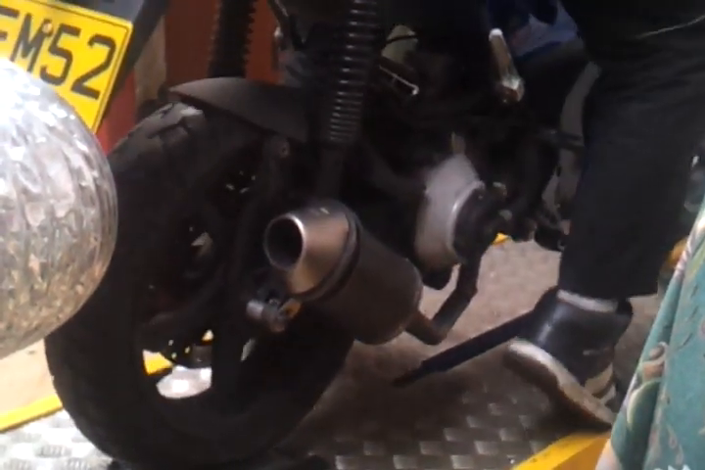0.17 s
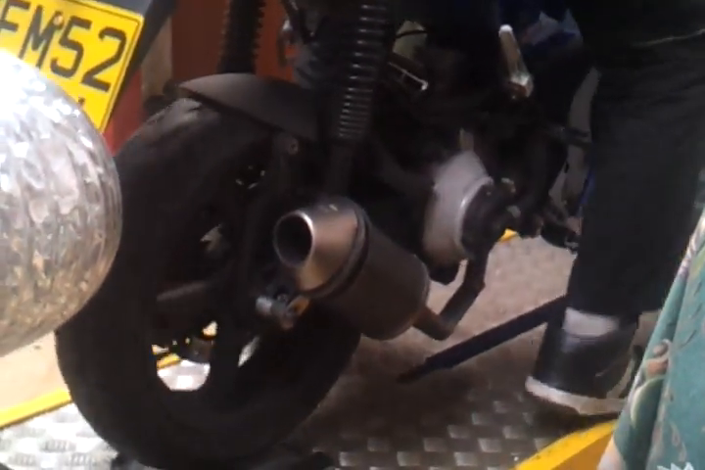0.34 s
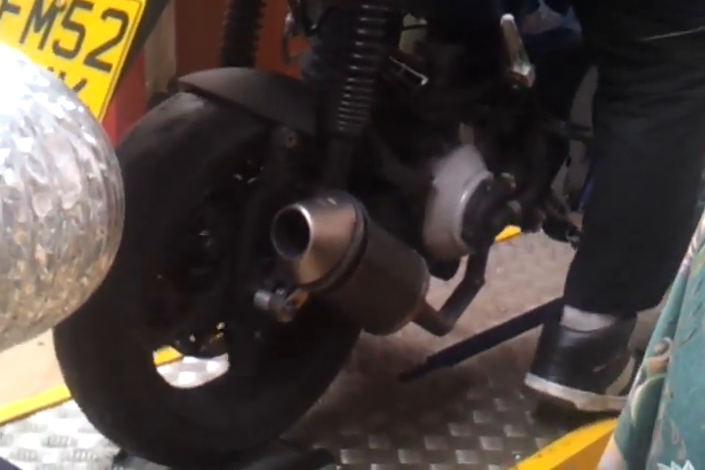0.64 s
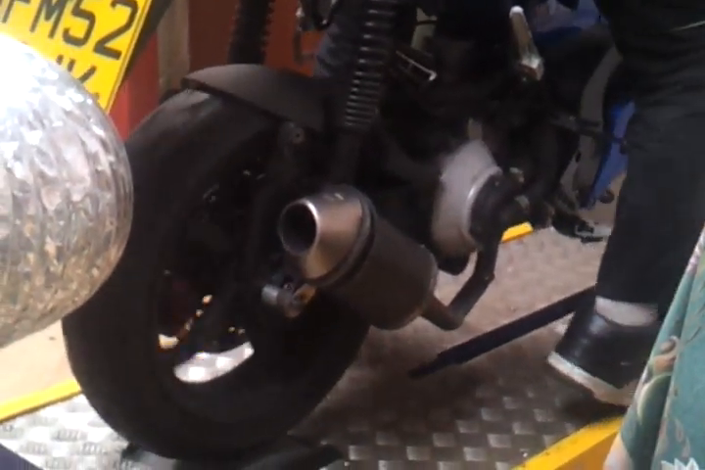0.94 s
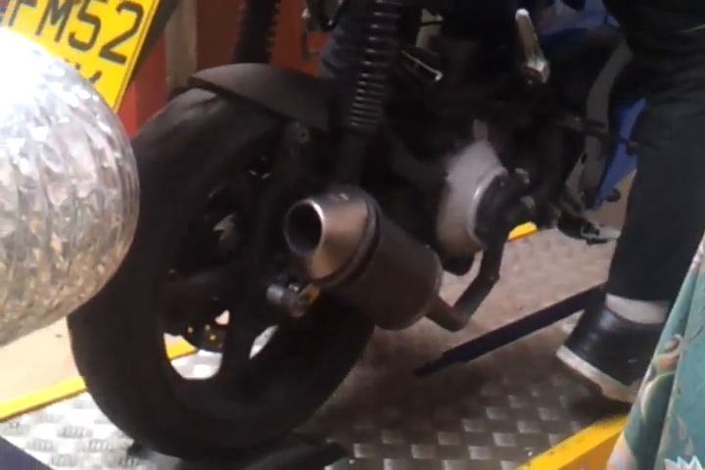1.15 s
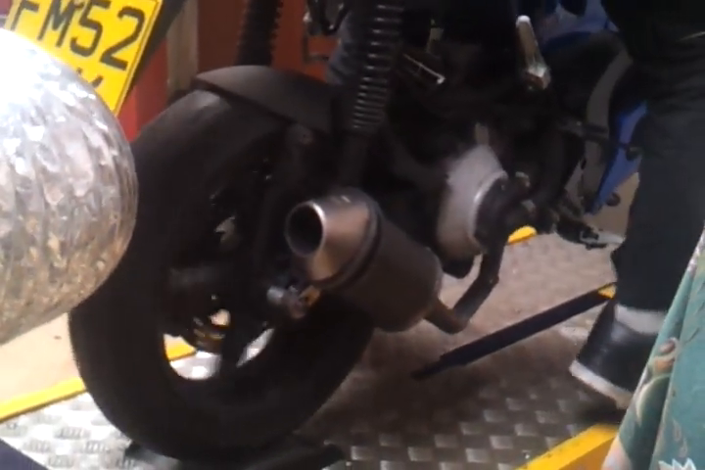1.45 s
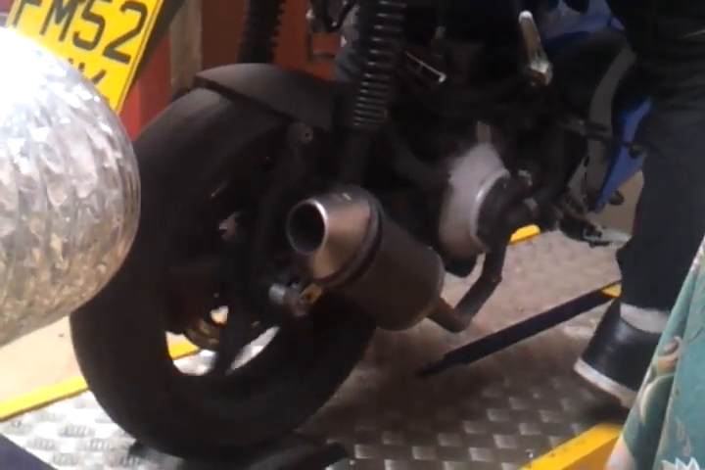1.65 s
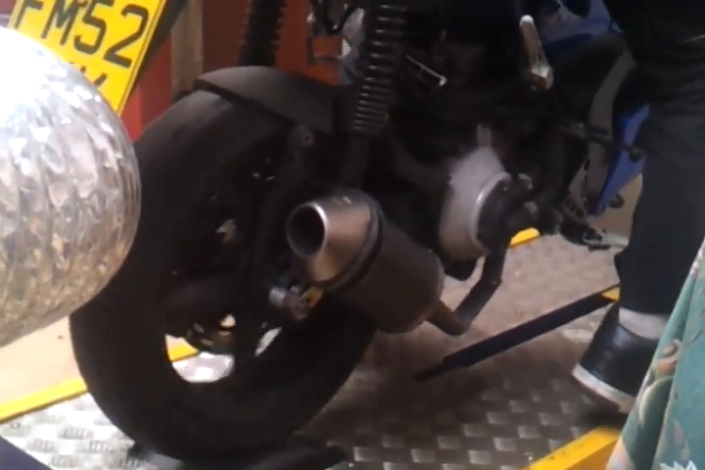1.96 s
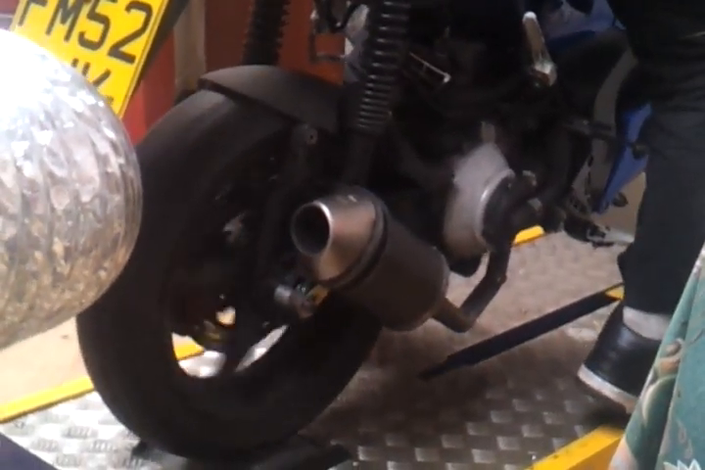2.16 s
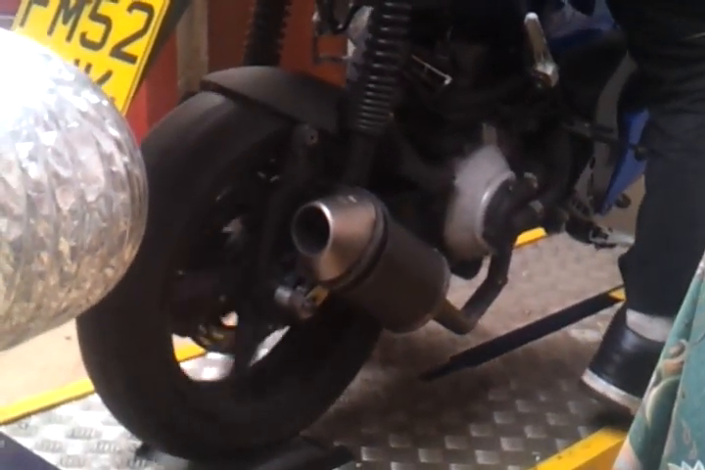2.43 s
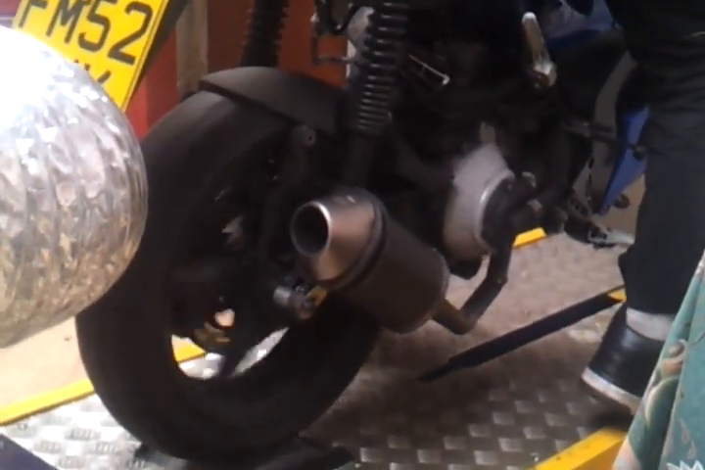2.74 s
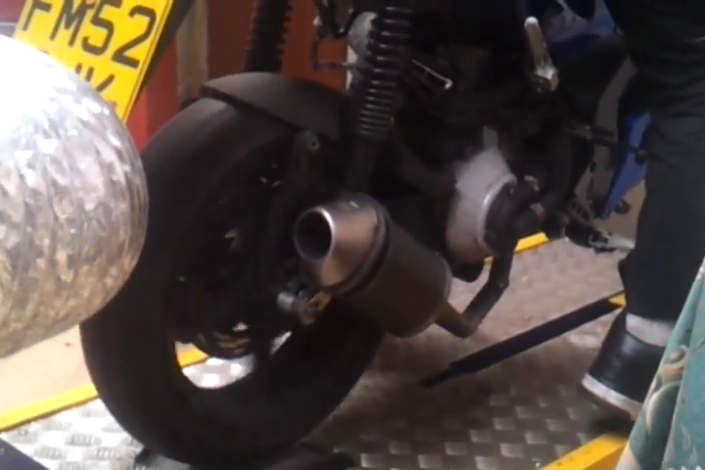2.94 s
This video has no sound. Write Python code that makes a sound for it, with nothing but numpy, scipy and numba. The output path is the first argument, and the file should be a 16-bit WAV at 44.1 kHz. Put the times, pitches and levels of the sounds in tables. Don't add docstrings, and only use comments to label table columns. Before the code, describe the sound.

A parked motorcycle engine idles and is revved four times in short, harsh, distorted exhaust bursts.

```python
import sys
import numpy as np
from scipy import signal
from scipy.fft import rfft, irfft
from scipy.io import wavfile
from scipy.ndimage import uniform_filter1d
from numba import njit

SR = 44100
rng = np.random.default_rng(int(sys.argv[2]) if len(sys.argv) > 2 else 0)


def to_wav(s):
    ch = np.atleast_2d(s).T
    pcm = np.round(np.clip(ch, -1, 1) * 32767)
    wavfile.write(sys.argv[1], SR, pcm.astype(np.int16))


def field_ratio(decibels):
    return 10 ** (np.asarray(decibels, dtype=float) / 20)


N = 136710

# (twist begins [s], wide open [s], shut [s], peak firing rate [Hz])
BLIPS = [
    (.21, .32, .46, 51.5),
    (1.19, 1.28, 1.45, 55.5),
    (1.97, 2.06, 2.19, 54),
    (2.75, 2.83, 2.975, 55),
]
BLIP_LOADS = (0.86, 1.06, 1.005, 0.99)
# (centre [Hz], width [Hz], level off throttle [dB], gain at full load [dB])
PIPE_MODES = [(100.7, 21, -3.5, -6), (206.66, 19.7, -6.5, 2.5), (263.85, 20.9, -4.5, 0.5),
              (300.4, 32.4, -11, 1), (369.4, 48, -12, 8.5), (455.4, 83, -18.5, 14.5), (604, 215, -21, 18.5),
              (740, 198, -21.5, 16), (1112, 193, -33, 21), (1445, 160, -29, 21.5)]
# (centre [Hz], width [Hz], level off throttle [dB], gain at full load [dB], puffed share [0-1])
GAS_BANDS = [(309, 238, -15.5, 10.5, .4), (750, 583, -23.5, 17.5, 1), (1836, 740, -21, 12, 0.93),
             (3423, 950, -26.5, 15, 0.83), (5730, 3100, -18.5, 8.5, 0.84)]
# (time [s], level [dB], centre [Hz])
CLACKS = [
    (.23, -7, 5900),
    (.787, -8, 4200),
    (1.2, -8, 5800),
    (2.02, -3, 5800),
    (2.78, -10, 5800),
]

IDLE_HZ, WARMUP_S = 17.5, 0.3


def level(x):
    return x / np.sqrt(np.mean(x ** 2))


@njit
def svf(x, hz, width_hz):
    y = np.empty(len(x))
    band, low = 0., 0.
    g, k = np.tan(np.pi * hz / SR), width_hz / hz
    for i in range(len(x)):
        v = (band + g * (x[i] - low)) / (1 + g * (g + k))
        band = 2 * v - band
        low += 2 * g * v
        y[i] = k * v
    return y


def resonance(x, hz, first_width_hz, second_width_hz):
    return level(svf(svf(x, 1. * hz, 1. * first_width_hz), 1. * hz, 1. * second_width_hz))


def walk(rate_hz, size):
    hold = int(SR / rate_hz)
    steps = np.repeat(rng.standard_normal(size // hold + 1), hold)
    return 1.1 * uniform_filter1d(uniform_filter1d(steps, hold), hold)[:size]


def throttle(t):
    sag_s, sag_bend, rise_bend = 0.265, 1.15, 1.15
    load_fade_s, fade_bend, open_bend = 0.19, 1.5, 1.3
    hz, load = np.full(len(t), IDLE_HZ), np.zeros(len(t))
    for (start, wide, shut, peak_hz), push in zip(BLIPS, BLIP_LOADS):
        start_hz = np.interp(start, t, hz)
        since_shut = np.maximum(t - shut, 0)
        rise = start_hz + (peak_hz - start_hz) * np.clip((t - start) / (shut - start), 0, 1) ** rise_bend
        sag = IDLE_HZ + (peak_hz - IDLE_HZ) * np.exp(-(since_shut / sag_s) ** sag_bend)
        hz = np.where(t < start, hz, np.where(t < shut, rise, sag))
        opening = np.clip((t - start) / (wide - start), 0, 1) ** open_bend
        load = np.maximum(load, push * opening * np.exp(-(since_shut / load_fade_s) ** fade_bend))
    return hz, load


@njit
def fire(hz, stretch, size, start_turn):
    pulses, phase = np.zeros(len(hz)), np.empty(len(hz))
    turn, cycle = start_turn, 0
    for i in range(len(hz)):
        turn += hz[i] * stretch[cycle] / SR
        if turn >= 1:
            turn, cycle = turn - 1, cycle + 1
            pulses[i] = size[cycle]
        phase[i] = turn
    return pulses, phase


def exhaust_pipe(pulses, load):
    pipe = 0
    for k, (hz, width_hz, db, up_db) in enumerate(PIPE_MODES):
        pipe = pipe + (-1) ** k * field_ratio(db + up_db * load) * resonance(pulses, hz, width_hz, 2 * width_hz)
    boom_filter = signal.butter(2, (119, 154), "band", fs=SR, output="sos")
    return pipe + field_ratio(4.5 - 5.5 * load) * level(signal.sosfilt(boom_filter, pulses))


def gas_rasp(phase, load):
    puff_turns, flicker_db = 0.68, 1.2
    puff = level(np.exp(-phase / puff_turns))
    gas = 0
    for hz, width_hz, db, up_db, share in GAS_BANDS:
        loudness = field_ratio(db + up_db * load + flicker_db * walk(24.94, len(load)))
        puffing = 1 + np.clip(share * (1 - 0.72 * load), 0, 1) * (puff - 1)
        gas = gas + loudness * puffing * resonance(rng.standard_normal(len(load)), hz, width_hz, 1.5 * width_hz)
    return gas


def valve_ticks(phase, hz):
    decay_s = 0.00067
    strike = sum(np.exp(-((phase - turn) % 1) / hz / decay_s) for turn in (0.52, 0.7, 0.45))
    strike = strike * field_ratio(1.8 * walk(29.51, len(hz)))
    return field_ratio(-23) * level(svf(strike * rng.standard_normal(len(hz)), 5300., 4500.))


def engine(hz, load):
    jitter, scatter_db = 0.006, 1.5
    engine_db, speed_db_per_octave, load_db = -2, 5.5, -2
    chance = rng.standard_normal((400, 2)).T
    pulses, phase = fire(hz, 1 + jitter * chance[0], field_ratio(scatter_db * chance[1]), 0.35)
    pulses = pulses * np.sqrt(IDLE_HZ / hz)
    sound = exhaust_pipe(pulses, load) + gas_rasp(phase, load) + valve_ticks(phase, hz)
    return sound * field_ratio(engine_db + speed_db_per_octave * np.log2(hz / IDLE_HZ) + load_db * load)


def linkage(t):
    clack_s, width_hz = 0.0023, 700.
    rattle = 0
    for time_s, db, hz in CLACKS:
        burst = np.exp(-.5 * ((t - time_s) / clack_s) ** 2)
        rattle = rattle + field_ratio(db) * burst * level(svf(rng.standard_normal(len(t)), 1. * hz, width_hz))
    return rattle


@njit
def walls(x, lags, gain, damp):
    line, soft, out = np.zeros((8, 4096)), np.zeros(8), np.zeros(len(x))
    for i in range(len(x)):
        total = 0.
        for k in range(8):
            soft[k] += (1 - damp) * (gain[k] * line[k, (i - lags[k]) & 4095] - soft[k])
            total += soft[k]
        out[i] = soft[0] - soft[3] + soft[5] - soft[6]
        for k in range(8):
            line[k, i & 4095] = x[i] + soft[k] - total / 4
    return out


def workshop(bike):
    t60_s, damp = 0.35, 0.37
    lags = rng.integers(500, 2600, 8)
    return field_ratio(-9) * walls(bike - svf(bike, 115.6, 204.), lags, field_ratio(-60 * lags / SR / t60_s), damp)


def rumble():
    return field_ratio(-14.5) * level(svf(rng.standard_normal(N), 45.7, 90.))


def scene():
    early = int(WARMUP_S * SR)
    bike = engine(*throttle(np.arange(-early, N) / SR))
    running = (bike + workshop(bike))[early:]
    return (running + rumble() + linkage(np.arange(N) / SR))[None]


def squash(x, rail, knee):
    return x / (1 + np.abs(x / rail) ** knee) ** (1 / knee)


def narrow(x, leak_db):
    edge_hz = 6980
    x = np.pad(x, ((0, 0), (512, 512)), mode="reflect")
    hz = np.arange(x.shape[1] // 2 + 1) * SR / x.shape[1]
    gain = field_ratio(leak_db) + 1 / (1 + (hz / edge_hz) ** 16.)
    return irfft(rfft(x) * gain, x.shape[1])[:, 512:-512]


def low_pass(x):
    return signal.sosfilt(signal.butter(12, 15710, fs=SR, output="sos"), x)


def record(dry):
    grit_s, fade_in_s = 0.008, 0.004
    hard = narrow(squash(dry + 0.05, 0.71, 4), -36)
    busy = np.sqrt(uniform_filter1d(svf(hard[0], 2500., 5000.) ** 2, int(grit_s * SR)) + 1e-9)
    grit = field_ratio(-13) * busy * narrow(rng.standard_normal(dry.shape), -23)
    fade_in = np.clip(np.arange(N) / SR / fade_in_s, 0, 1)
    mix = (squash(hard + grit, 0.77, 12.) - 0.008) * fade_in
    return low_pass(mix)


dry = scene()
out = record(dry)
to_wav(out)
```